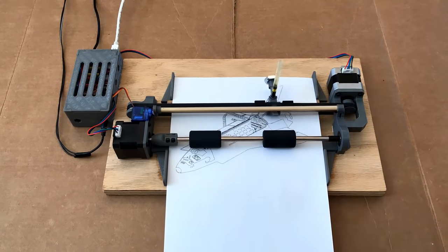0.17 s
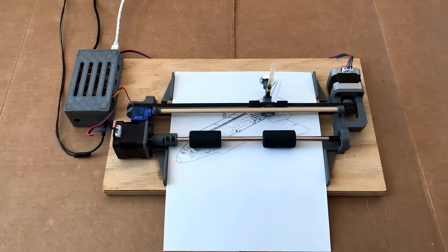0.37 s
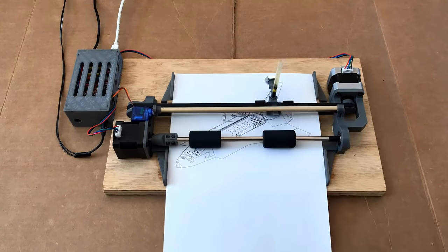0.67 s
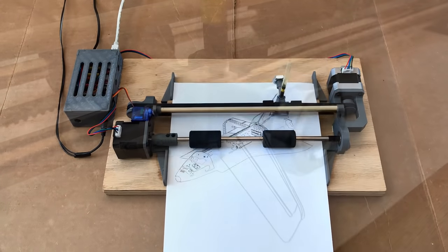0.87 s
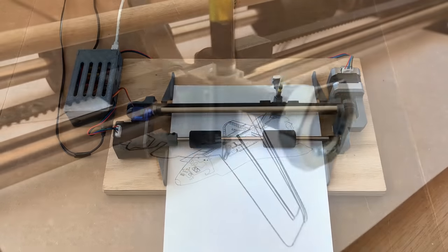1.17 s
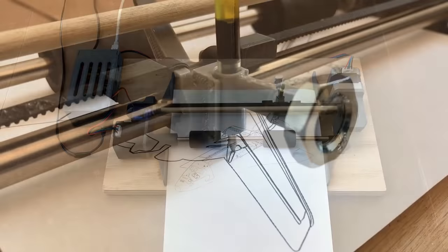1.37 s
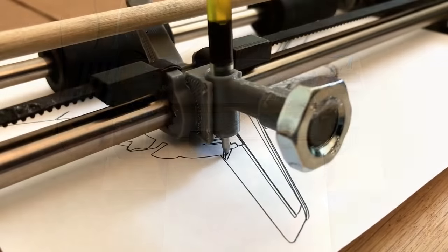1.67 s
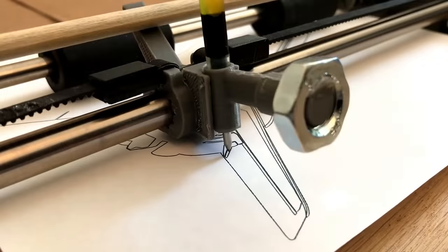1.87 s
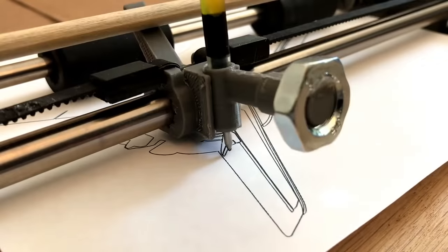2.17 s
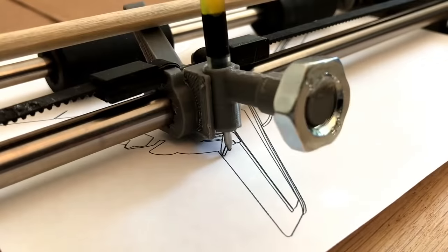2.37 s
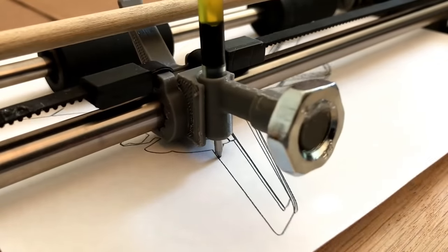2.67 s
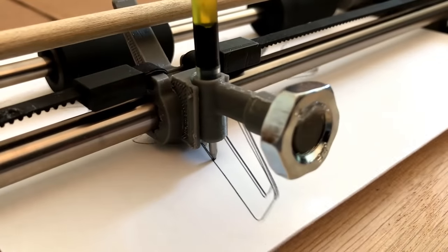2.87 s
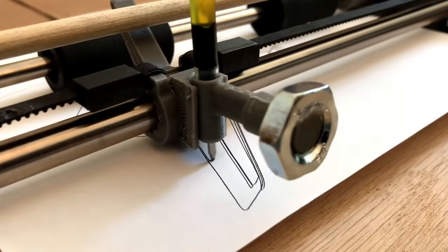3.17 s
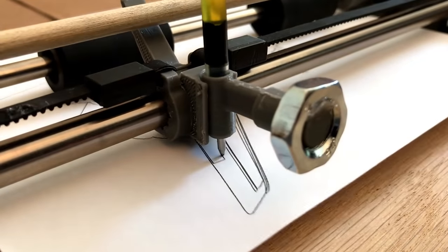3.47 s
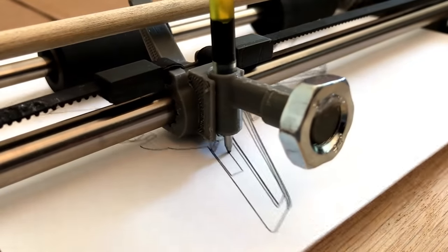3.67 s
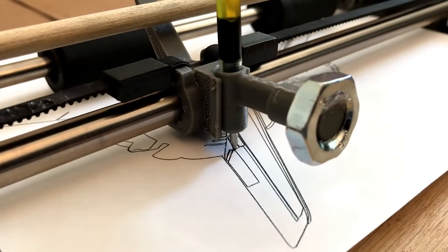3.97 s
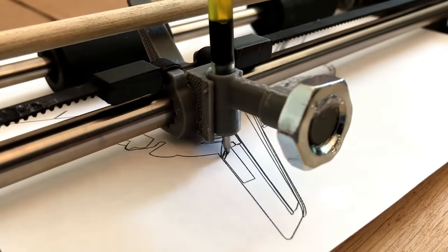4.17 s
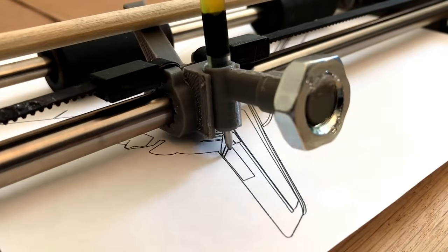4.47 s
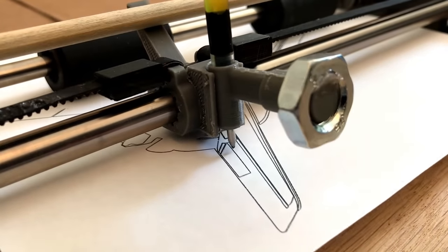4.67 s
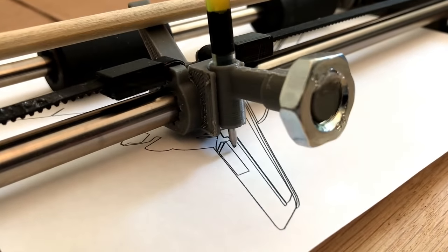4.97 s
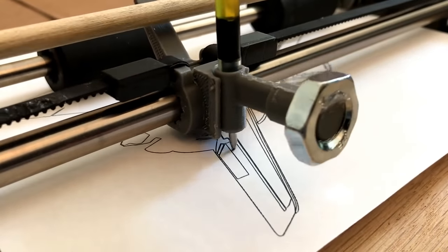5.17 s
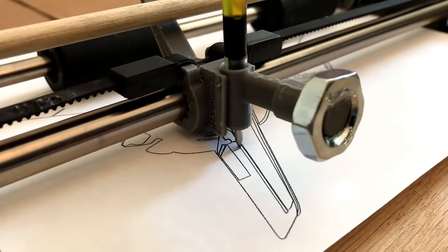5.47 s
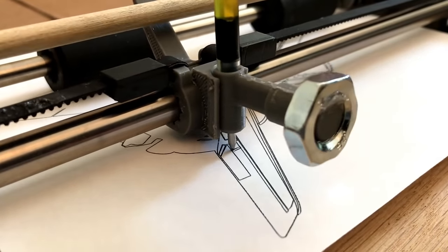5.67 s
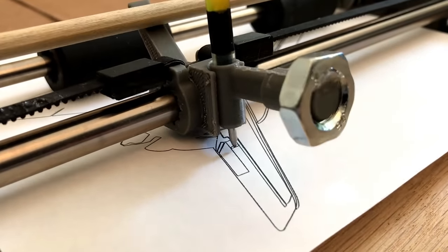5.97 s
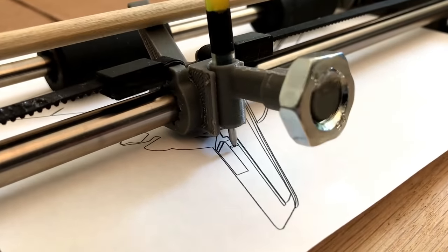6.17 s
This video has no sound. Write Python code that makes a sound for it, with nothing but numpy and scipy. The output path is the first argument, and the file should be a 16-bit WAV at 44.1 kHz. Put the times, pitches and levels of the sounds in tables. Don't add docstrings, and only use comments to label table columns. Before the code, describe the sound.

Silence for just over half a second, then a thin high electronic whine in a quiet room. A little geared servo buzzes, a pen thumps on wood, and stepper motors sweep up and down in pitch with dry rattle and bearing hiss. Strokes stop abruptly, leaving faint whines of different pitch; the servo buzzes and thumps between most of them. Close microphone, small dry room.

```python
import sys
import numpy as np
from scipy import signal
from scipy.fft import rfft, irfft, next_fast_len
from scipy.io import wavfile
from scipy.ndimage import uniform_filter1d

SR = 44100
rng = np.random.default_rng(int(sys.argv[2]) if len(sys.argv) > 2 else 0)


def dump_mix(stems):
    frames = np.atleast_2d(stems).T
    limited = np.clip(frames, -1, 1)
    pcm = np.round(limited * 32767).astype(np.int16)
    wavfile.write(sys.argv[1], SR, pcm)


def volts_from_decibels(level):
    exponent = np.asarray(level, float) / 20
    return 10 ** exponent


N = 279153
T = np.arange(N) / SR

# [from t/s, to t/s]
REST_TIMES = [
    (.555, .784),
    (1.678, 2.03),
    (2.138, 2.5),
    (4.236, 4.615),
    (4.798, 5.151),
    (5.85, 6.181),
    (6.258, 6.355),
]
# [chopper f/Hz, stray tone level/dB]
REST_PITCHES = [(2566, -72), (2563, -71), (982, -72), (984, -75), (1562, -68), (1556, -68), (3031.5, -69)]
REST_POSITION = [0, 0, 1, 1, 2, 2, 3]
# [multiple, level/dB rms]
CHOPPER_TONES = [
    [(1, -64), (2, -61.5), (3, -80), (5, -80), (6, -79), (-4, -86), (-5, -65), (-7, -74)],
    [(3, -65), (6, -74.5), (7, -83), (9, -69), (10, -80), (11, -74), (12, -67), (13, -68), (14, -82)],
    [(1, -60), (2, -64), (4, -75), (5, -76), (7, -73), (8, -68), (9, -85), (10, -79), (-7, -79), (-8, -69),
     (-11, -85)],
    [(1, -64), (2, -53), (4, -66), (5, -72)],
]
FOLD_HZ = [25337, 0, 24644, 0]
STRAY_HZ = [8400, 8000, 8575, 8543]
# [f/Hz, level/dB rms]
OTHER_DRIVER = [
    [(12200, -85), (15700, -80)],
    [(2767, -57.5), (3989, -78), (7604, -77), (15057, -82)],
    [(11830, -86), (15305, -83)],
    [(1459, -62), (2912, -67), (11946, -82), (13550, -64), (13738, -75)],
]
# [f/Hz, level/dB per Hz]
ROOM_AIR = [(12, -26), (20, 1), (76, 2.5), (196, -1.5), (266, 1), (465, -11.5), (1130, -13.5), (2330, -23),
            (3960, -17), (4950, -23), (7730, -22.5), (8640, -21), (9390, -25.5), (12400, -17), (15500, -21)]

# [start t/s, spin-up t/s, length t/s, gear noise level/dB, level before braking/dB]
SERVO_SWINGS = [
    (.755, 0.016, 0.12, -38.5, -34),
    (1.739, 0.02, .11, -38.5, -36.5),
    (2.44, 0.032, 0.12, -35.5, -36.5),
    (4.316, 0.013, 0.11, -40, -34.5),
    (5.116, 0.019, 0.12, -34.5, -37.5),
    (5.9, 0.047, 0.12, -35, -38),
]
# [f/Hz, level/dB per Hz]
GEAR_COLOUR = [(59, -44), (100, -23), (243, 7), (447, -10), (564, -3), (1090, -7.5), (1620, -4.5),
               (2470, -10), (3390, -5), (3770, -9.5), (6660, 2), (7560, -3), (15500, -5)]
# [f/Hz, width/Hz, level/dB]
CASE_MODES = [(1590, 180, -13), (2220, 51, -2.5), (3426, 77, -4.5), (4360, 180, -3), (4980, 124, -5),
              (6250, 160, -3), (6740, 190, -4.5), (7300, 160, -5), (8660, 160, -8), (9270, 87, -3),
              (11130, 120, -2.5), (13550, 150, -1.5), (15500, 130, -25), (15800, 150, -4)]
# [t/s, peak level/dB]
SERVO_JOLTS = [(0.755, -34), (1.7425, -39), (2.441, -40.5), (4.3085, -32), (5.114, -35), (5.902, -37)]
# [t/s, peak level/dB]
PEN_THUMPS = [(0.811, -31), (1.782, -27), (2.486, -25), (4.359, -29), (5.158, -24.5), (5.949, -24)]
# [t/s, peak level/dB]
PEN_TICKS = [(1.0091, -33), (1.0594, -37), (1.6212, -26), (2.0293, -38), (2.1326, -38), (3.1278, -22),
             (3.6834, -30), (5.7613, -36)]

# [start t/s, end t/s, aimed step rate f/Hz, step tone level/dB, overtones level/dB]
MOVES = [(0.775, 0.992, 937, -54, -3.5), (0.924, 1.086, 453.8, -55, 0), (1.044, 1.394, 1520, -55, -3),
         (1.323, 1.472, 807, -56, 0), (1.449, 1.691, 1040, -55.5, -0.5), (2.007, 2.142, 880, -58, 1.5),
         (2.466, 2.729, 1189, -55, -0.5), (2.611, 3.182, 1776, -51.5, -3.5),
         (3.117, 3.424, 1370, -55, -5.5), (3.364, 4.022, 2067, -52, -2.5),
         (4.001, 4.265, 595.5, -53.5, 3.5), (4.574, 4.815, 774, -51, -3), (5.139, 5.405, 1133, -55, -5.5),
         (5.36, 5.519, 1005, -58, -7), (5.473, 5.735, 1143, -55, -3.5), (5.702, 5.856, 524.6, -57.5, 1),
         (6.171, 6.299, 504.7, -57.5, 6.5)]
# [middle t/s, share of speed 0-1, step tone level/dB, overtones level/dB]
FOLLOWS = [(.884, .613, -55, -9), (1.219, 0.55, -52, -4.5), (1.399, .37, -54, -7), (1.568, 0.64, -53, -2.5),
           (2.6, 0.62, -55.5, -0.5), (2.897, .401, -54.5, -2.5), (3.693, .44, -57, 1),
           (6.235, .51, -60, -10)]
# [frame level/dB, rods level/dB, board level/dB, bearings level/dB]
LOADS = [(2, 4.5, -9, 4.5), (0, 4, 0, 2), (2, 2, 2.5, 1.5), (0, 3.5, 2, 1.5), (-0.5, -1, 5.5, 1),
         (0, 1, 6.5, -1.5), (0, 3, 0.5, 2), (-1, -1, -2, -1.5), (1, -4.5, -2, -0.5), (0.5, 1.5, -1.5, 0),
         (0.5, 3.5, 6.5, 3.5), (1, 2.5, 5, 1.5), (-4, -5.5, 4, -1), (1.5, -1.5, 5, -1.5),
         (-4.5, -6.5, 3, 0.5), (1.5, -2.5, 0, -1), (-0.5, -1, -7, -2)]
# [start t/s, stop t/s]
STROKES = [
    (.785, 1.675),
    (2.02, 2.142),
    (2.475, 4.25),
    (4.586, 4.803),
    (5.148, 5.842),
    (6.18, 6.27),
]
# [f/Hz, level/dB]
RADIATION = [(280, -16.5), (400, 5), (530, 1), (620, 1), (750, 7), (880, 7), (1050, 10.5), (1420, -2),
             (1680, 1), (1950, -3.5), (2500, 6), (3000, -15), (3360, 3), (4500, -20)]
# [f/Hz, width/Hz, level/dB]
BOARD = [(159, 19.5, -0.5), (185, 27, -4.5), (263, 67.5, -3.5)]
# [f/Hz, width/Hz, level/dB]
FRAME = [(462, 404, 8.5), (807, 178, 9.5), (988, 189, 12.5), (1612, 193, 4.5)]
# [f/Hz, width/Hz, level/dB]
RODS = [(2202, 610, 3), (2800, 540, 7.5), (3410, 89, 2)]
# [f/Hz, level/dB per Hz]
BEARINGS = [(2060, -10), (3500, -1), (3660, -1), (3960, 1.5), (4780, -3), (5210, -1), (6990, -2),
            (7910, -6.5), (8580, -1), (9240, -4), (10400, -6.5), (12500, -1.5), (14400, -8), (15500, -3.5)]
# [standstill level/dB, level at KNEE_HZ/dB, top speed level/dB]
BOOM_LAW = (-41.5, -51, -52)
# [standstill level/dB, level at KNEE_HZ/dB, top speed level/dB]
RATTLE_LAW = (-48, -47.5, -52.5)
# [standstill level/dB, level at KNEE_HZ/dB, top speed level/dB]
CLATTER_LAW = (-55, -52, -53.5)
# [standstill level/dB, level at KNEE_HZ/dB, top speed level/dB]
HISS_LAW = (-57, -54, -46.5)

# [t/s, share lost 0-1]
THINNED = [(1.52, .9), (1.842, .7), (2.18, .85), (2.524, .8), (2.651, .9), (3.055, .9), (3.099, .9),
           (3.162, .9), (3.311, .9), (3.375, .9), (3.632, .95), (4.015, .95), (4.306, .6), (4.807, .9),
           (5.317, .9), (5.55, .9), (6.042, .85), (6.299, .9)]
# [f/Hz, level/dB]
BAND_EDGE = [(100, 0), (15780, 0), (15950, -45), (16500, -50)]

START_S, ROOM_DB = 0.567, -55.5
TOP_SPEED_HZ, KNEE_HZ = 1678, 500
ROUND_S = 0.004
SET_OFF_S, STOP_DB_PER_S, BOARD_STOP_DB_PER_S = 0.0086, 1800, 326
SPIN_UP_DB, BRAKE_S, BRAKE_DB, CASE_DB = -16, 0.046, -21.5, -9.5
TICK_HZ, TICK_T60 = 5200, 0.01
JOLT_HZ, JOLT_T60 = 7040, 0.11
THUMP_HZ, THUMP_T60 = 258.3, 0.042
KNOCK_DB, KNOCK_T60 = -8.5, 0.018


def evened(x):
    return x / np.sqrt(np.mean(x ** 2) + 1e-20)


def drift(size):
    return evened(uniform_filter1d(uniform_filter1d(rng.standard_normal(N), size), size))


def coloured(x, points):
    hz, db = np.transpose(points)
    size = next_fast_len(N)
    bins_hz = np.fft.rfftfreq(size, 1 / SR)
    gain = volts_from_decibels(np.interp(np.log(bins_hz + 1), np.log(hz), db))
    return irfft(rfft(x, size) * gain, size)[:N]


def lumpy(x, depth_db, size):
    bins = next_fast_len(N)
    ripple = rng.standard_normal(bins // 2 + 1)
    ripple = uniform_filter1d(uniform_filter1d(ripple, size), size)
    return irfft(rfft(x, bins) * volts_from_decibels(depth_db * evened(ripple)), bins)[:N]


def resonate(x, hz, width):
    r = np.exp(-np.pi * width / SR)
    return signal.lfilter([1 - r, 0, r - 1], [1, -2 * r * np.cos(2 * np.pi * hz / SR), r * r], x)


def body(x, modes, flare_db=0.0, size=600):
    out = np.zeros(N)
    for k, (hz, width, db) in enumerate(modes):
        flare = volts_from_decibels(db + flare_db * drift(size))
        out += (-1) ** k * flare * resonate(resonate(x, hz, width), hz, 2 * width)
    return evened(out)


def knocks(per_s, spread_db, smooth):
    size = volts_from_decibels(spread_db * np.minimum(rng.exponential(1, N), 3.2)) * rng.choice([-1., 1.], N)
    impacts = evened(size * (rng.random(N) < per_s / SR))
    return impacts + smooth * rng.standard_normal(N)


def holding_whine():
    out = np.zeros(N)
    for (start, end), (chop_hz, stray_db), p in zip(REST_TIMES, REST_PITCHES, REST_POSITION):
        lines = [(round(k) * chop_hz + (k < 0) * FOLD_HZ[p], db) for k, db in CHOPPER_TONES[p]]
        lines += list(OTHER_DRIVER[p]) + [(STRAY_HZ[p], stray_db)]
        now = (T > start) & (T < end)
        t = T[now]
        fade = np.clip(np.minimum(t - start, end - t) / 0.0027, 0, 1)
        for hz, db in lines:
            out[now] += fade * volts_from_decibels(db - 2.5) * np.sin(2 * np.pi * (hz * t + rng.random()))
    return out


def room_air():
    return volts_from_decibels(ROOM_DB - 5.0) * evened(coloured(rng.standard_normal(N), ROOM_AIR))


def servo():
    level = np.zeros(N)
    for start, up, length, db, late_db in SERVO_SWINGS:
        times = [0, up, length - BRAKE_S, length, length + 0.039]
        levels = [db + SPIN_UP_DB, db, late_db, late_db + BRAKE_DB, late_db + BRAKE_DB - 23]
        swinging = (T > start) * (T < start + length + 0.05)
        level += volts_from_decibels(np.interp(T - start, times, levels)) * swinging
    teeth = evened(knocks(9000, 2.0, 1.2) * volts_from_decibels(1.9 * drift(size=90)))
    ring = body(teeth, [(hz, 1.3 * width, db) for hz, width, db in CASE_MODES], 3.2, size=350)
    chatter = evened(coloured(teeth, GEAR_COLOUR))
    return uniform_filter1d(level, size=30) * (chatter + 2.6 * volts_from_decibels(CASE_DB) * ring)


def pen():
    length = 6000
    out, t = np.zeros(N + 7000), np.arange(length) / SR
    cracks = [(*row, TICK_HZ, TICK_T60) for row in PEN_TICKS]
    cracks += [(*row, JOLT_HZ, JOLT_T60) for row in SERVO_JOLTS]
    for s, db, hz, t60 in cracks:
        crack = evened(resonate(rng.standard_normal(length), hz, 5300.0)) * 0.5
        out[round(s * SR) + 40:][:length] += volts_from_decibels(db - 60 * t / t60) * crack
    for s, db in PEN_THUMPS:
        tip = evened(resonate(rng.standard_normal(length), 900, 1500.0)) * 0.5
        tip *= volts_from_decibels(db + KNOCK_DB - 60 * t / KNOCK_T60)
        thump = np.sin(2 * np.pi * THUMP_HZ * t) * (1 - np.exp(-t / 0.001))
        thump *= volts_from_decibels(db - 5.5 - 60 * t / THUMP_T60)
        out[round(s * SR):][:length] += tip + thump
    return out[:N]


def step_rate(start, end, top_hz):
    middle = (start + end) / 2
    ramp = top_hz * (1 - np.hypot(T - middle, ROUND_S) / (end - middle))
    return np.clip(ramp, 0, TOP_SPEED_HZ)


def fastest_rate(moves):
    return np.max([step_rate(*row[:3]) for row in moves], 0)


def motors():
    out = [(step_rate(*row[:3]), *row[3:], load[2]) for row, load in zip(MOVES, LOADS)]
    for s, share, db, second_db in FOLLOWS:
        lead = np.argmin([abs((row[0] + row[1]) / 2 - s) for row in MOVES])
        out.append((share * out[lead][0], db, second_db, out[lead][3]))
    return out


def running(stop_db_per_s):
    return sum(np.clip((T - start) / SET_OFF_S, 0, 1) * volts_from_decibels(-stop_db_per_s * np.clip(T - stop, 0, 1))
               for start, stop in STROKES)


def step_tones():
    sung, slow = np.zeros((2, N))
    for hz, db, second_db, board_db in motors():
        on = hz > 0
        hz = hz[on]
        turn = 2 * np.pi * (np.cumsum(hz) / SR + rng.random())
        overtones = np.sin(2 * turn) + volts_from_decibels(-4.5) * np.sin(3 * turn) + volts_from_decibels(-21) * np.sin(4 * turn)
        tone = np.sin(turn) + volts_from_decibels(second_db - 4.0) * overtones
        sung[on] += volts_from_decibels(db + 4.5) * tone * np.clip((hz - 210) / 220, 0, 1)
        braking = np.gradient(hz) < 0
        pull = np.clip((hz - 60) / 110, 0, 1)
        slow[on] += pull * volts_from_decibels(board_db - 1.9 * braking) * (np.sin(turn) + 0.41 * np.sin(2 * turn))
    slow = slow * running(BOARD_STOP_DB_PER_S)
    sweep = sum(volts_from_decibels(db) * resonate(resonate(slow, hz, width), hz, 2 * width) for hz, width, db in BOARD)
    wavering = sung * volts_from_decibels(2.1 * drift(size=300))
    return lumpy(coloured(wavering, RADIATION), 1.8, size=400) + volts_from_decibels(-42) * sweep


def current_cycle():
    hz = fastest_rate(MOVES)
    fast = fastest_rate([row for row in MOVES if row[2] > 1300])
    cogging = np.sin(2 * np.pi * np.cumsum(fast) / SR / 8) * (fast > 0)
    cogging = resonate(resonate(cogging, 147, 22), 147, 30)
    gate = np.exp(1.5 * (np.cos(2 * np.pi * np.cumsum(hz) / SR / 32) - 1))
    gate *= volts_from_decibels(3.5 * drift(size=5000)) * np.clip((hz - 150) / 200, 0, 1)
    chirp = body(rng.standard_normal(N), [(8630, 110, 0)])
    rumble = body(rng.standard_normal(N), [(47.0, 10.0, 1.5), (92, 110, 0)])
    rumble *= uniform_filter1d(hz, size=2000) / 1700
    return volts_from_decibels(-41) * cogging + volts_from_decibels(-56.5) * chirp * gate + volts_from_decibels(-55.5) * rumble


def loads():
    active = np.argmax([step_rate(*row[:3]) for row in MOVES], 0)
    return uniform_filter1d(np.transpose(LOADS)[:, active] * 1., size=600, axis=1)


def carriage():
    hz = fastest_rate(MOVES)
    frame_db, rods_db, _, bearings_db = loads()

    def shaking(law, load_db):
        return volts_from_decibels(np.interp(hz, [0, KNEE_HZ, TOP_SPEED_HZ], law) + load_db)

    steps = np.cumsum(hz) / SR
    shared = knocks(900, 3.45, 1.0) * np.exp(0.16 * np.cos(2 * np.pi * steps / 4))
    clicks = np.diff(np.floor(steps / 4), prepend=0)
    teeth = evened(clicks * volts_from_decibels(4 * rng.standard_normal(N)))
    slack = knocks(60, 2.4, 0.0)
    fine = knocks(3000, 2.5, 0.56) + 0.35 * slack + 0.3 * teeth

    boom = shaking(BOOM_LAW, 0) * body(knocks(200, 3.0, 0.35), BOARD, 5.0, size=1200)
    rattle = shaking(RATTLE_LAW, frame_db) * body(shared, FRAME, 1.2)
    rod_drive = shared + 0.5 * fine + 0.48 * slack + 0.67 * teeth
    clatter = shaking(CLATTER_LAW, rods_db) * body(rod_drive, RODS, 2.45, size=800)
    bright = evened(lumpy(coloured(fine + 0.75 * shared, BEARINGS), 1.3, size=500))
    hiss = shaking(HISS_LAW, bearings_db) * bright
    return boom * running(BOARD_STOP_DB_PER_S) + (rattle + clatter + hiss) * running(STOP_DB_PER_S)


def room(x):
    t = np.arange(9000) / SR
    taps = rng.choice([-1., 1.], len(t)) * (rng.random(len(t)) < 0.05)
    taps *= volts_from_decibels(-60 * t / 0.085) * (t > 0.004)
    return signal.fftconvolve(x, taps / np.linalg.norm(taps))[:N]


def scene():
    still = holding_whine() + room_air()
    machine = servo() + pen() + step_tones() + current_cycle() + carriage()
    return (still + machine + volts_from_decibels(-16.0) * room(machine))[None]


def thin_out(x):
    out, window = x.copy(), np.hanning(1100)
    for s, share in THINNED:
        part = out[round(s * SR) - 550:][:1100]
        frame = part * window
        lines = rfft(frame)
        strong = abs(lines) > 2.15 * uniform_filter1d(abs(lines), size=91)
        strong = uniform_filter1d(1. * strong, size=3) > 0
        strong |= np.arange(len(lines)) < 25
        part += share * (irfft(lines * strong) - frame)
    return out


def low_pass(x):
    return signal.sosfilt(signal.butter(12, 16800, fs=SR, output="sos"), x)


def record(dry):
    mix = coloured(thin_out(dry[0]), BAND_EDGE)
    mix = mix * np.clip((T - START_S) / 0.005, 0, 1)
    return low_pass(mix[None])


dry = scene()
out = record(dry)
dump_mix(out)
```